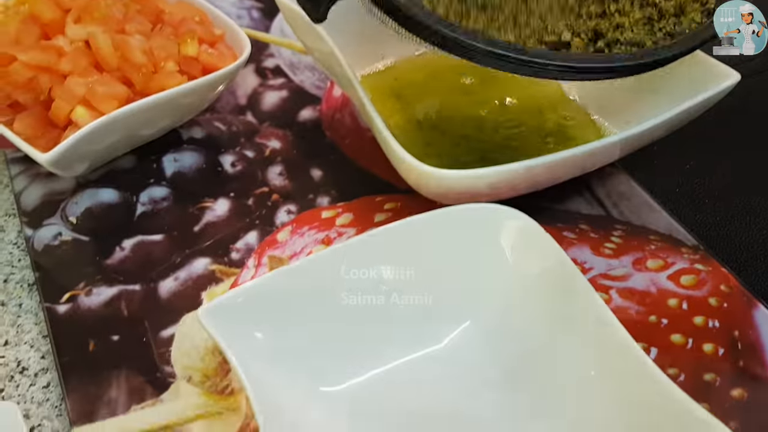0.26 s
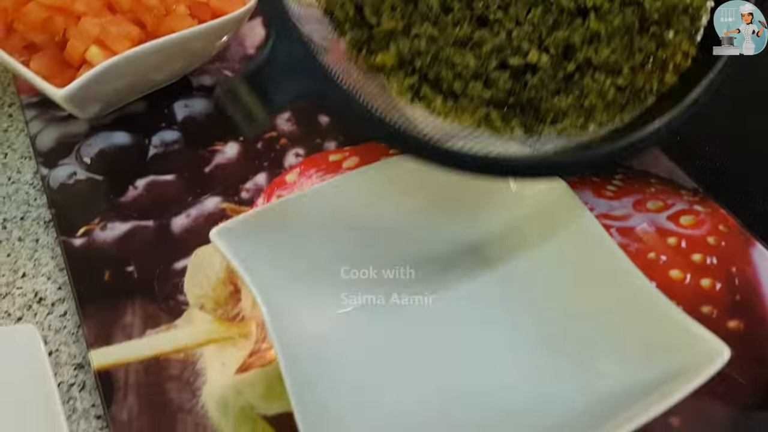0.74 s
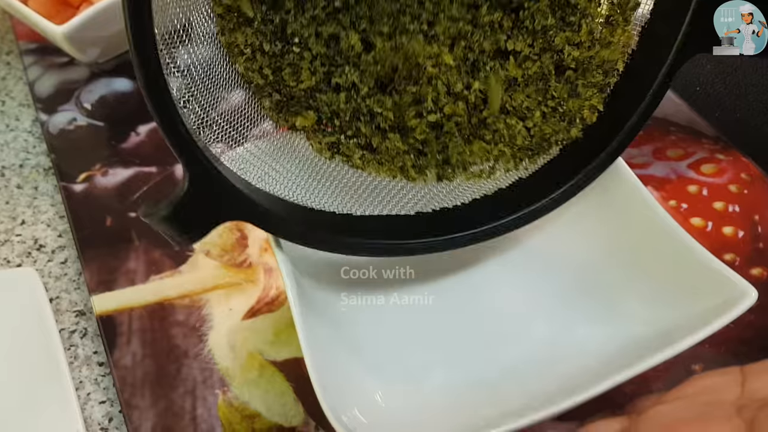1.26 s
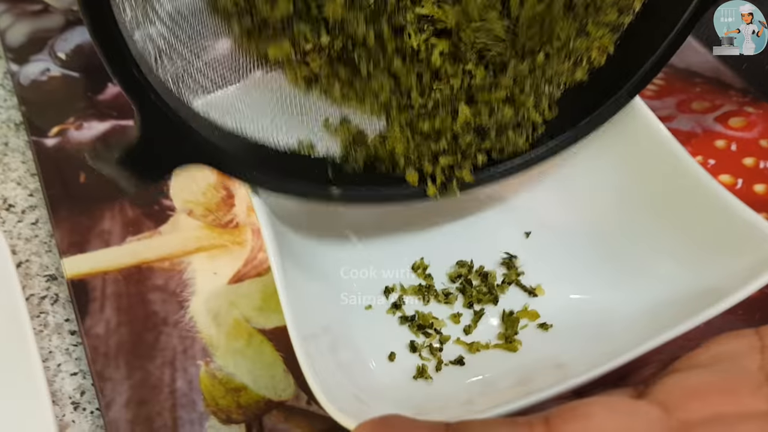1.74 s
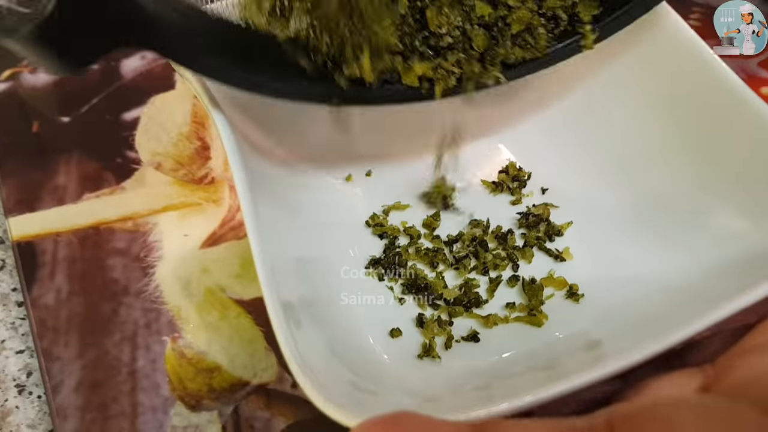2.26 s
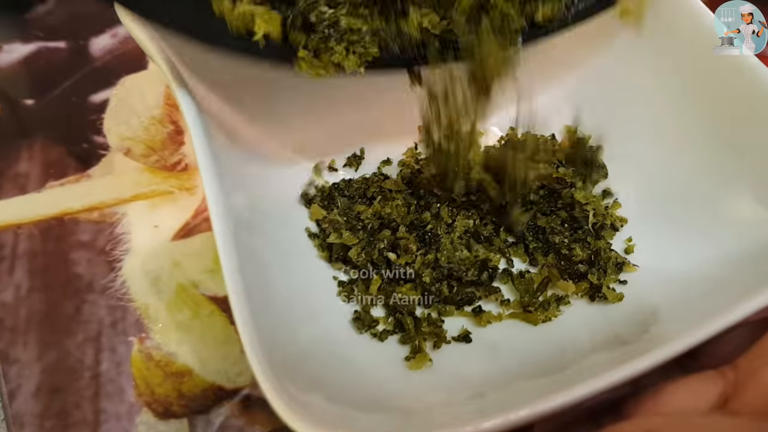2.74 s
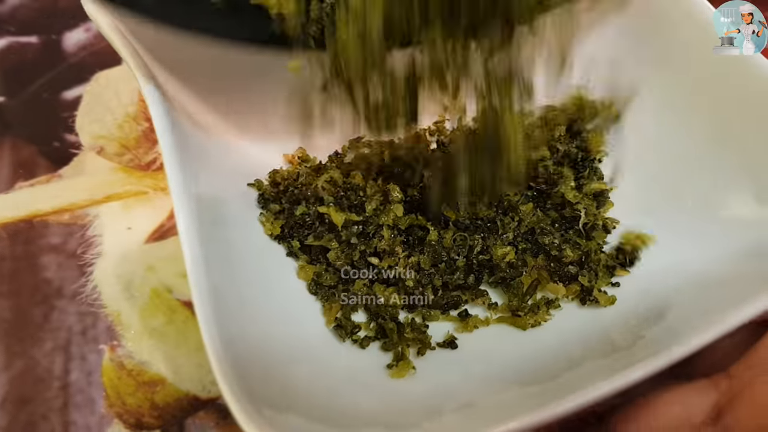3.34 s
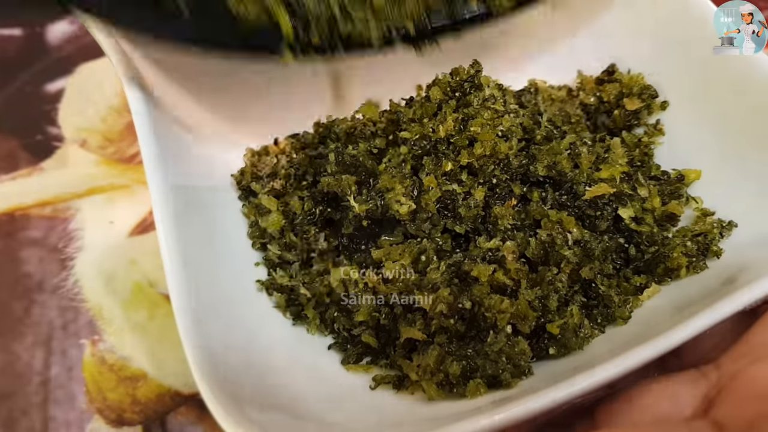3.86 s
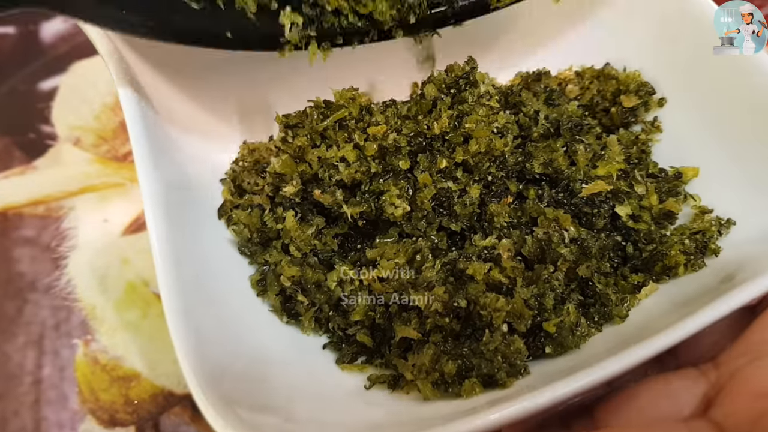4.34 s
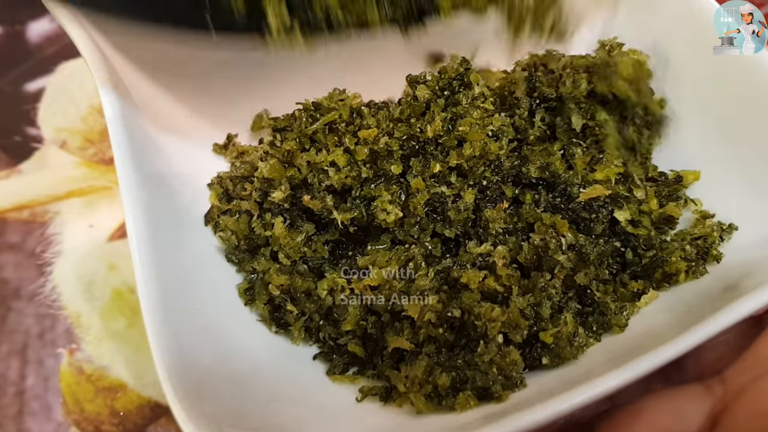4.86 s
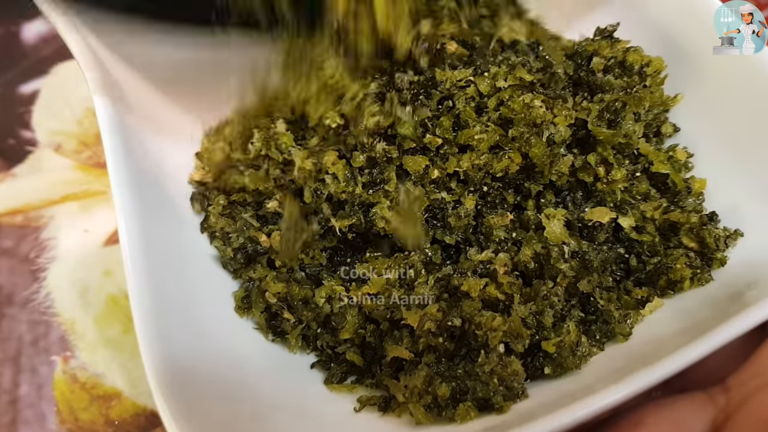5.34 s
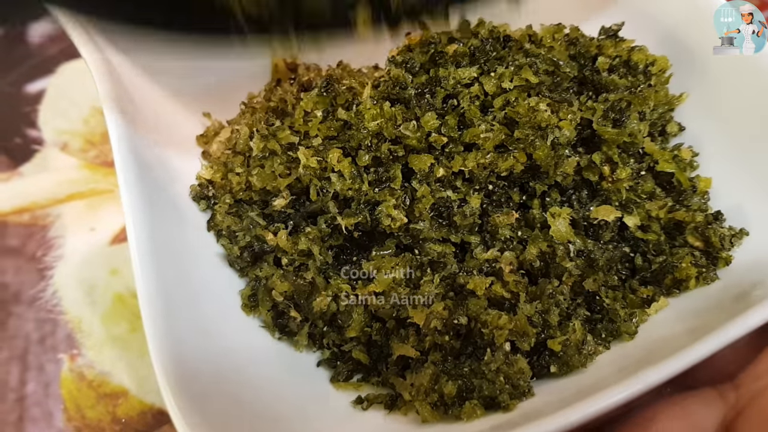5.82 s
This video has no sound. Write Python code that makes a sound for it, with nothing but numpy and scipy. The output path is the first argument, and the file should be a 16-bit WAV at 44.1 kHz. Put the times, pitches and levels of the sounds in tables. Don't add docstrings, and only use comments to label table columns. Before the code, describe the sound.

A strainer's rim clacks sharply against a ceramic dish in two hard doubles, then softer knocks and faint crumb patter follow over a quiet kitchen hum.

```python
import sys
import numpy as np
from scipy import signal
from scipy.fft import rfft, irfft, next_fast_len
from scipy.io import wavfile
from scipy.ndimage import uniform_filter1d, minimum_filter1d, map_coordinates

SR = 44100
rng = np.random.default_rng(int(sys.argv[2]) if len(sys.argv) > 2 else 0)


def file_out(sig):
    cols = np.atleast_2d(sig).T
    lim = np.clip(cols, -1, 1)
    pcm = np.round(lim * 32767).astype(np.int16)
    wavfile.write(sys.argv[1], SR, pcm)


def elevation(decibels):
    levels = np.asarray(decibels, float)
    return 10 ** (levels / 20)


N = 268480


def unit(x):
    return x / np.sqrt(np.mean(x ** 2) + 1e-20)


def along(points, hz):
    f, v = np.transpose(points)
    return np.interp(np.log(hz + 1), np.log(f + 1), v)


def curves(rows):
    s, *cols = np.transpose(rows)
    return [np.interp(np.arange(N) / SR, s, c, left=-150, right=-150) for c in cols]


def wobble(rate):
    knots = rng.standard_normal(int(N * rate / SR) + 4)
    return map_coordinates(knots, [np.arange(N) * rate / SR])


def filtered(x, response):
    m = next_fast_len(len(x) + 8192)
    return irfft(rfft(x, m) * response(np.fft.rfftfreq(m, 1 / SR)), m)[:len(x)]


def coloured(x, points, size=2048):
    cepstrum = irfft(np.log(elevation(along(points, np.fft.rfftfreq(size, 1 / SR)))))
    cepstrum[1:size // 2] *= 2
    cepstrum[size // 2 + 1:] = 0
    return signal.fftconvolve(x, irfft(np.exp(rfft(cepstrum))))[:len(x)]


def body(modes, between_db=-200):
    def response(f):
        total = elevation(between_db)
        for k, (hz, width, db) in enumerate(modes):
            resonance = 1j * f * width / (hz * hz - f * f + 1j * f * width)
            total = total + (-1) ** k * elevation(db) * resonance
        return total
    return response


def after(events, rise_s, t60):
    t = np.arange(N) / SR
    power = np.zeros(N)
    for s, length, db in events:
        release_db = 120 * np.maximum(t - s - length, 0) / t60
        power += elevation(2 * db - release_db) * np.clip((t - s) / rise_s, 0, 1) ** 2
    return np.sqrt(power)


def add(track, s, x):
    part = track[round(s * SR):][:len(x)]
    part += x[:len(part)]


# freq_hz [Hz], t60_s [s]
KITCHEN_DECAY = [(100, 0.84), (400, 0.28), (1000, 0.36), (3000, 0.34), (7000, 0.31), (14000, 0.13)]


def in_room(x, wet_db, near_db=-40):
    hz, t, noise = signal.stft(rng.standard_normal(SR // 2), SR, nperseg=256)
    t60 = np.maximum(along(KITCHEN_DECAY, hz), .05)[:, None]
    fall = elevation(-60 * t / t60) + elevation(near_db - 60 * t / .07)
    tail = signal.istft(noise * fall, SR, nperseg=256)[1]
    tail = np.pad(tail, (130, 0))
    return elevation(wet_db) * signal.fftconvolve(x, tail / np.linalg.norm(tail))[:len(x)]


MAINS_HZ, SHAFT_HZ, FAN_HZ = 50.05, 49.345, 107
OPPOSED_S = .52
FAN_DB = -77
# mains_multiple [x], level_db [dB rms]
MAINS_HUM = [(2, -66), (4, -77)]
# shaft_multiple [x], level_db [dB rms]
ROTOR_ORDERS = [(1, -75), (2, -76), (3, -79), (4, -73), (5, -88), (6, -87)]


def fridge():
    t = np.arange(N) / SR - OPPOSED_S

    def tone(hz, db):
        level = elevation(db + 3 + 1.2 * wobble(4))
        return level * np.sin(2 * np.pi * hz * t + .15 * wobble(3))

    hum = sum(tone(k * MAINS_HZ, db) for k, db in MAINS_HUM)
    rotor = sum(tone(k * SHAFT_HZ, db) for k, db in ROTOR_ORDERS)
    return hum - rotor - tone(FAN_HZ, FAN_DB)


DEEP_DB, HISS_DB = -72.5, -76
SHAKE_DB, SHAKE_PER_DB, SHAKE_RISE_S, SHAKE_T60_S = -42, 0.92, 0.033, 0.92
SIFT_DB, SIFT_PER_DB, SIFT_T60_S, SIFT_FALL_DB = -63.5, 0.06, 0.2, -7.5
# freq_hz [Hz], level_db [dB per Hz]
AIR_COLOUR = [(12, -54), (20, -22), (38, -5), (70, -13.5), (85, -4), (103, -13.5), (126, -22.5), (202, -21),
              (427, -34), (631, -37), (2270, -45.5), (6360, -40.5), (9800, -43), (10400, -46.5),
              (15500, -51.5)]
# time_s [s], level_db [dB]
DISTANT_STIR = [
    (0, -71),
    (1, -69),
    (1.9, -75),
    (2.7, -70.5),
    (4.0, -74),
    (4.8, -75),
    (5.3, -68.5),
    (6.09, -76),
]


def air():
    def blows(top_db, per_db):
        return [(s, 0, top_db + per_db * db) for s, db, *_ in HARD_BLOWS + BOUNCES + SOFT_BLOWS]

    def band(lo, hi):
        noise = rng.standard_normal(N)
        return unit(filtered(noise, lambda f: elevation(along(AIR_COLOUR, f)) * (f >= lo) * (f < hi)))

    shake = after(blows(SHAKE_DB, SHAKE_PER_DB), SHAKE_RISE_S, SHAKE_T60_S)
    falls = [(s, length, db + SIFT_FALL_DB) for s, length, db, _ in CRUMB_FALLS]
    sift = after(blows(SIFT_DB, SIFT_PER_DB) + falls, 0.037, SIFT_T60_S)
    deep, stir = band(0, 94), band(108, 900)
    mid, hiss = band(900, 4700), band(4700, SR)
    table = unit(filtered(rng.standard_normal(N), lambda f: body([(86, 40, 0)])(f) ** 2))
    deep = deep * np.hypot(elevation(DEEP_DB + 1.2 * wobble(2.5)), elevation(-5.5) * shake) + shake * table
    stir = stir * elevation(curves(DISTANT_STIR)[0] + 2.0 * wobble(9))
    mid = mid * elevation(-84.0 + wobble(1.4))
    hiss = hiss * np.hypot(elevation(HISS_DB + .7 * wobble(3)), sift)
    return deep + stir + mid + hiss


DRY_CLICK_DB = -9
# start_s [s], length_s [s], pitch_hz [Hz],
# width_hz [Hz], level_db [dB]
SCUFFS = [(0, .005, 1500, 3000, -66), (.087, .11, 322, 187, -68.5), (.123, .04, 6600, 700, -79),
          (.126, .04, 3980, 500, -75), (.165, .04, 3980, 600, -72), (.36, .022, 2060, 600, -73),
          (.36, .022, 3870, 500, -78), (.38, .04, 2200, 500, -79), (.435, .1, 3930, 390, -76),
          (.492, .04, 2070, 350, -73), (.555, .007, 1000, 2000, -65), (.895, .13, 446, 300, -70.5),
          (1.322, .018, 7000, 4000, -64), (1.8662, .003, 7800, 2200, -47), (2.076, .11, 373, 250, -69),
          (2.27, .05, 6000, 5000, -69), (2.299, .016, 1780, 500, -76), (2.428, .28, 874, 690, -74),
          (2.541, .11, 290, 200, -63.5), (3.047, .023, 2000, 700, -77), (3.265, .015, 1627, 500, -48),
          (3.29, .06, 6000, 4000, -68), (3.395, .06, 6200, 3800, -65), (3.5, .1, 6200, 4000, -64),
          (4.073, .062, 3500, 3500, -70), (4.526, .1, 1160, 450, -78.5), (4.54, .1, 340, 200, -74.5),
          (5.055, .05, 6500, 4000, -72), (5.357, .15, 470, 250, -67), (5.872, .019, 2200, 700, -81)]


def rubs():
    out = np.zeros(N)
    for s, length, hz, width_hz, db in SCUFFS:
        n = int(length * SR)
        grit = np.repeat(elevation(rng.normal(0, 2.8, SR // 200)), 101)[:SR // 2]
        stroke = np.sqrt(np.sin(np.pi * (np.arange(n) / n) ** 0.5))
        scuff = np.zeros(SR // 2)
        scuff[:n] = (rng.standard_normal(SR // 2) * grit)[:n] * stroke
        resonance = body([(hz, width_hz, 0)])
        heard = filtered(scuff, lambda f: resonance(f) ** 2 / (1 + (f / 11500) ** 8))
        wet_db = -7.0 + DRY_CLICK_DB * (length < .006)
        add(out, s, elevation(db) * np.sqrt(SR / width_hz / 2) * (heard + in_room(heard, wet_db)))
    return out


# time_s [s], level_db [dB]
SLIDE_LEVEL = [
    (0.42, -88),
    (0.56, -75),
    (0.852, -68.5),
    (1.11, -76),
]
# freq_hz [Hz], level_db [dB per Hz]
MAT_COLOUR = [(290, -24), (500, -17), (786, -21.5), (1460, -11), (1710, -12.5), (2690, -8.5), (4450, -13),
              (6470, -16.5), (11000, -30.5), (14300, -48.5), (22000, -120)]


def slide():
    grains = rng.standard_normal(N) * elevation(2.4 * wobble(480) + 0.91 * wobble(27))
    hiss = elevation(curves(SLIDE_LEVEL)[0] + 7.5) * unit(coloured(grains, MAT_COLOUR))
    return hiss + in_room(hiss, wet_db=-8.5)


STANDING_RISE_S = 0.035
# pitch_hz [Hz], level_db [dB], t60_s [s]
CUPBOARD_WAVES = [(169, -11, 0.2), (290.7, -15.5, .4), (346, -19, .3), (458.3, -3.5, 0.18),
                  (610, -11.5, 0.29)]


def standing(db, t):
    modes = 0
    for hz, level, t60 in CUPBOARD_WAVES:
        fall = elevation(level + rng.normal(0, 3.4) - 60 * t / t60)
        waver = 1 + .45 * np.cos(2 * np.pi * (rng.uniform(8, 20) * t + rng.random()))
        modes = modes + fall * waver * np.sin(2 * np.pi * hz * t)
    return elevation(db) * modes * (1 - np.exp(-t / STANDING_RISE_S))


ECHO_RISE_S = 0.0073
BLOOM = .6
EDGE_DB, EDGE_PER_DB = -3, 0.29
SLAP_S, SLAP_DB = 0.018, -12.5
# start_s [s], level_db [dB peak], thud_db [dB], brightness_db [dB], chatter_s [s]
HARD_BLOWS = [
    (1.114, -20.5, -17, -20, 0.012),
    (1.123, -16.5, -17.5, -23.5, 0.008),
    (1.359, -26, -15.5, -25.5, 0.02),
    (1.3736, -8.5, -16, -16, 0.008),
    (1.381, -8, -15.5, -15.5, 0.006),
    (1.519, -21.5, -10, -13, 0.0036),
    (1.5411, -5, -14, -12.5, 0.008),
    (1.553, -8, -14, -13.5, 0.008),
]
BOUNCES = [
    (1.656, -21, -14, -18.5, 0.0074),
    (1.679, -30, -11, -21, 0.0086),
]
SOFT_BLOWS = [(2.73, -31.5, -10.5, -23.5, 0.008), (2.734, -31.5, -8, -22.5, 0.0048),
              (2.799, -40, -5, -33.5, 0.0027), (3.2647, -30.5, -9.5, -19, 0.018),
              (3.463, -30.5, -7.5, -19.5, 0.0048), (3.577, -25.5, -10, -21, 0.003),
              (3.581, -29, -12, -21, 0.0067), (3.684, -35, -5, -28, 0.0073),
              (5.18, -32.5, -5.5, -21, 0.0091), (5.495, -33, -3.5, -25.5, 0.011),
              (5.614, -47, -0.5, -28, 0.0068), (5.993, -27.5, -7, -18, 0.015)]
# at_600_hz [dB], at_850_hz [dB], at_1000_1300_hz [dB], at_1400_2200_hz [dB]
HARD_SPOTS = [(-9, -4, 0.4, 2), (-11, -2.1, 2, -1.55), (-0.6, -5, 1.5, 0.35), (-2, -0.9, -0.26, 1.2),
              (-3.5, 1.6, 0.2, 1), (-2.5, -5, 3.4, 2.5), (0, -1.5, 0.3, 0.8), (0.4, -2.3, 1.5, 0)]
BOUNCE_SPOTS = [(-7, 0, .1, 2.5), (2, -0.5, .1, -14)]
SOFT_SPOTS = [(3, -2, 1.1, 2), (0, -2.5, 1.1, -1.2), (1, 1, .1, -3), (-1, 2.5, 2.8, 2), (-3.5, 1.5, .1, -3),
              (6, 0.7, 0.87, 1.5), (-3, 2, .1, -1.5), (2, .1, 0.12, -5), (2, 0.4, .1, -3),
              (0.7, 1, 0.11, -2), (4, 4.5, .1, 1), (0, 4, 2.1, 2)]
# freq_hz [Hz], width_hz [Hz], level_db [dB]
HARD_GAPS = [(704.4, 40, -7.5), (1110, 40, -1.5), (4853, 200, -4)]
SOFT_GAPS = [(964, 48, -3.5), (1290, 68, -1.5), (2160, 54, -8.5)]
# pitch_hz [Hz], width_hz [Hz], level_db [dB]
RIM_ON_DISH = [(465, 25, -14), (590, 42, 4), (861, 44, 4), (1220, 19, -10), (1360, 35, -10),
               (1490, 25, -12), (1710, 39, -8), (2200, 25, -10), (2430, 46, -10), (2640, 43, -13),
               (2890, 41, -12), (3660, 64, -17), (3980, 26, -15), (4600, 68, -23), (4960, 30, -20)]
# pitch_hz [Hz], width_hz [Hz], level_db [dB]
RIM_TWINS = [(532, 36, -4), (781, 30, -5), (819, 30, -3), (915, 36, -4), (1015, 34, -7), (1624, 30, -7),
             (1930, 35, -12)]
# pitch_hz [Hz], width_hz [Hz], level_db [dB]
RIM_IN_AIR = [(291, 18, -14), (452, 27, -9), (556, 30, -9), (592, 34, -5), (710, 30, -9), (781, 22, -8),
              (819, 26, -9), (853, 34, 1), (890, 34, -2), (1220, 26, -10), (1490, 22, -14), (1640, 29, -14),
              (1705, 30, -17), (1940, 45, -19), (2200, 16, -24), (2440, 33, -15), (2630, 39, -19),
              (2890, 34, -17), (3020, 25, -22), (3310, 15, -26), (3690, 32, -22)]


def knocks(blows, spots, gaps, modes, gain_db, ring_db, between_db, wet_db, thump_db, swell, boom_db):
    out, t = np.zeros(N), np.arange(SR // 2) / SR
    hz, width, top_db = np.transpose(modes)
    slope = np.polyfit(np.log(hz), top_db, 1)
    top_db = top_db - np.polyval(slope, np.log(hz))
    f = np.arange(20, 8000, 20.)
    blurred = elevation(2 * top_db - 9) / (1 + ((f[:, None] - hz) / (1.1 * width)) ** 2)
    humps = list(zip(f, 10 * np.log10(elevation(2 * between_db) + np.sum(blurred, 1))))
    dips = list(zip(f, sum(db / (1 + ((f - c) / w) ** 2) for c, w, db in gaps)))
    blow = (t == 0) * 1.
    strongest_db = max(row[1] for row in blows)
    for (s, db, thud_db, bright_db, length), (low_db, main_db, mid_db, spot_db) in zip(blows, spots):
        u = t / max(length, .001)
        contacts = rng.standard_normal(len(t)) * (rng.random(len(t)) < .3)
        contacts[0] = 3.4
        chatter = contacts * (0.31 + u) * np.exp(-u ** 2)
        chatter /= np.linalg.norm(chatter)
        edge_db = EDGE_DB + EDGE_PER_DB * (db - strongest_db)
        tilt = [(40, -43.0), (250, -20.5), (450, thud_db + 7), (590, low_db - 3.5), (700, -2.5),
                (820, main_db - 2.0), (900, main_db - 4.0), (1010, mid_db - 4.0), (1250, mid_db - 5.5),
                (1500, edge_db + spot_db - 1), (2150, edge_db + spot_db - 0.5), (2500, edge_db - 4.0),
                (3300, edge_db - 4.0), (5500, bright_db + 2.5), (9000, bright_db - 16.5),
                (12500, bright_db - 33.0), (14500, bright_db - 47.5), (16000, bright_db - 75)]
        scatter_db = rng.normal(0, 1.7, len(hz))
        level = elevation(top_db + along(tilt, hz) + scatter_db) * width / SR
        phase = rng.random((len(hz), 1))
        swing = np.sin(2 * np.pi * (hz[:, None] * t + phase)) * np.exp(-np.pi * width[:, None] * t)
        build_up = 1 - swell * np.exp(-u / .45 * (hz[:, None] / 1500) ** BLOOM)
        ring = elevation(ring_db) * level @ (swing * build_up) * (1 - np.exp(-t / .0008))
        rattle = coloured(coloured(chatter, tilt), dips)
        direct = ring + elevation(between_db) * rattle
        sideways = coloured(coloured(coloured(blow, tilt), humps), dips)
        echo = in_room(sideways, wet_db, near_db=3.5) * (1 - np.exp(-t / ECHO_RISE_S))
        thump = coloured(blow, [(30, -39.0), (90, -8.0), (200, -16.0), (330, -9.0), (470, -15),
                                (800, -17.0), (2000, -72.5)])
        thump = 0.4 * thump + in_room(thump, wet_db=2.0, near_db=-0.5)
        add(out, s, elevation(db + gain_db) * (direct + echo + elevation(thud_db + thump_db) * thump))
        add(out, s + SLAP_S, elevation(db + gain_db + SLAP_DB) * direct)
        add(out, s, standing(db + thud_db + boom_db, t))
    return out


# start_s [s], pitch_hz [Hz], level_db [dB], t60_s
# [s]
LONE_RINGS = [ (1.121, 788, -47, .62), (1.121, 350, -48, .3), (1.125, 172, -52, .3), (1.543, 345, -27, .2),
              (1.376, 345, -46, .2), (1.545, 41, -48, .6), (1.376, 85, -50, .4), (1.542, 96, -45, .3),
              (1.66, 452, -42, .3), (1.545, 6150, -46, .12), (1.377, 6150, -50, .12),
              (1.125, 1490, -44, .2), (1.125, 2200, -52, .5), (1.125, 1630, -50, .5), (3.585, 452, -44, .3),
              (3.27, 722, -50, .3), (3.268, 1490, -50, .2), (3.585, 783, -46, .25), (6.0, 783, -46, .4),
              (6.0, 452, -40, .3), (3.268, 1750, -50, .12), (5.27, 1630, -70, .2), (3.31, 7860, -62, .15),
              (3.456, 7860, -67, .2), (3.545, 7860, -61, .3), (3.545, 8800, -67, .25),
              (3.682, 7860, -66, .2), (2.388, 8800, -66, .4), (2.265, 11700, -72, .3),
              (2.683, 12400, -66, .12), (2.683, 13000, -69, .2), (2.44, 13000, -72, .4),
              (1.545, 10600, -64, .25), (1.545, 11700, -61, .13), (1.545, 12900, -64, .16),
              (1.38, 13000, -68, .14), (2.852, 7860, -58, .15), (2.683, 7860, -57, .15), (1.6, 82, -47, .6),
              (1.551, 1091, -61, 1.4), (1.543, 6977, -41, .22), (1.518, 6977, -50, .2),
              (1.375, 6977, -47, .2), (3.578, 13600, -65, .1), (3.597, 13600, -66, .08),
              (3.545, 12400, -71, .2), (3.578, 12400, -65, .15), (4.08, 4960, -72, .2),
              (4.204, 5222, -70, .2),
              (1.122, 784, -33, .16), (1.12, 1100, -50, .15), (1.12, 2416, -41, .12),
                  (1.376, 1357, -24, .13), (1.543, 1620, -28, .13), (1.38, 13600, -71.5, .12),
                  (1.38, 11800, -64, .08), (1.546, 9700, -55, .08), (1.36, 6150, -50, .1),
                  (1.36, 5220, -50, .1), (1.517, 6150, -43, .12), (1.517, 5220, -44, .12),
                  (1.517, 4280, -42, .1), (1.38, 2200, -36, .3), (1.55, 2200, -34.5, .3),
                  (1.55, 1220, -36, .25), (2.415, 2800, -66, .4), (5.262, 2885, -69, .2),
                  (5.29, 2770, -68, .15), (1.543, 590, -23, .16), (1.543, 2440, -30, .12),
                  (1.57, 857, -30, .45), (1.376, 590, -28, .14), (1.135, 868, -35, .2),
                  (1.656, 1850, -37, .06), (2.44, 4280, -59, .35), (2.44, 1630, -68, .4),
                  (3.266, 1500, -46, .07), (5.996, 851, -42, .25), (5.996, 891, -46, .2),
                  (1.543, 7030, -44, .15)]


def rings():
    out, t = np.zeros(N), np.arange(SR) / SR
    for s, hz, db, t60 in LONE_RINGS:
        add(out, s, elevation(db - 60 * t / t60) * np.sin(2 * np.pi * hz * t) * (1 - np.exp(-t / 0.0021)))
    return out


TOP_DB, TOP_PER_DB = -3.5, 0.7
# start_s [s], level_db [dB peak], flank_db [dB], hardness_db [dB]
DISH_TICKS = [(1.3608, -31, -8, -20), (1.374, -33, -1, -24), (1.5169, -28.5, -5, -18),
              (1.541, -18, -9.5, -14), (1.9124, -79, 0.5, 18), (2.0014, -56.5, -8.5, -11),
              (2.129, -66, -4.5, -5), (2.2665, -61, -21, 3), (2.3647, -66.5, 3, 0), (2.388, -77, 2, 11.5),
              (2.4247, -63, 1.5, -4), (2.4507, -55.5, 9, 4), (2.462, -56, -4, 5), (2.474, -58, 2, 9),
              (2.534, -70, -13, 11), (2.5569, -61, -11, 1.5), (2.5744, -62, 3, 9), (2.6016, -55, -1, 4),
              (2.63, -68, -10.5, 6), (2.683, -68.5, -16, 20.5), (2.708, -66.5, -8.5, 11),
              (2.852, -69.5, 3, 19), (2.9077, -75.5, -6.5, 13.5), (2.948, -71, -17, 10.5),
              (2.982, -78, -9.5, 18), (3.1567, -75.5, 8, 14), (3.2887, -69.5, -1, 6),
              (3.3013, -72, -8, 12.5), (3.3147, -66.5, -12, 3), (3.4037, -75, -14, 3),
              (3.455, -75, -11.5, 10), (3.5464, -67.5, -19, 7), (3.57, -64, -15, 13),
              (3.5974, -66, -13.5, -10), (3.6814, -73.5, -10, 13.5), (4.0444, -75.5, -8, 16),
              (4.0792, -62.5, -19, -7), (4.1649, -64, -18.5, -3), (4.203, -66.5, -13, 10),
              (4.829, -58, -22, -8), (4.8783, -64.5, -23, -2), (5.2698, -59, -20, -3.5),
              (5.587, -69, -7.5, 6.5)]
# pitch_hz [Hz], width_hz [Hz], level_db [dB]
DISH_MODES = [(1630, 28, -11), (1950, 33, -21), (2200, 27, -18), (2770, 26, -6), (2885, 24, -6),
              (3920, 26, -15), (4280, 28, 0), (5220, 53, -18), (6140, 46, -16), (6860, 46, -7),
              (7030, 33, -8), (7460, 69, -10), (7860, 34, -3), (8800, 32, -9), (9750, 31, -21),
              (10600, 30, -17), (11000, 100, -21), (11700, 36, -21), (12200, 26, -24), (12400, 37, -19),
              (13000, 37, -20), (13600, 46, -28)]


def ticks():
    out = np.zeros(N)
    for s, db, mid_db, high_db in DISH_TICKS:
        spot = [(1700, -12.5), (2800, -1), (3900, mid_db - 10.5), (4300, mid_db + 2.5), (5600, high_db - 0.5),
                (7400, high_db), (11000, TOP_DB + TOP_PER_DB * high_db)]
        modes = [(hz, w, d + along(spot, hz) + rng.normal(0, 2.5)) for hz, w, d in DISH_MODES]
        tap = np.zeros(SR // 4)
        tap[rng.integers(0, 900, 8)] = rng.normal(0, .22, 8)
        tap[0] = .9
        contact = np.convolve(tap, np.hanning(5))[:len(tap)]
        ring = filtered(contact, body(modes))
        add(out, s, elevation(db + 41.5) * (ring + in_room(ring, wet_db=-9.5)))
    return out


FALL_ATTACK_S, FALL_T60_S, TRICKLE_DB = .009, .18, -105
FLANK_DB, BURIED_DB_PER_S = 2, -8
FINEST_DB, FINEST_DB_PER_S = -5, -3
HEAP_DB, HEAP_DB_PER_S = -12, 1.5
# start_s [s], length_s [s], level_db [dB], bare_floor_db [dB]
CRUMB_FALLS = [(1.912, 0.12, -80.5, -5.5), (1.996, 0.054, -78, -2), (2.259, 0.086, -72.5, -11),
               (2.371, 0.059, -71, -1), (2.421, 0.039, -62.5, -4), (2.511, 0.18, -68.5, -2.5),
               (2.847, 0.16, -77, -9), (3.148, .05, -71.5, -17), (3.29, 0.044, -67, 0),
               (3.395, 0.042, -70, -1), (3.495, 0.094, -63, -2.5), (4.037, 0.029, -78.5, -5),
               (4.093, .14, -78.5, -2.5), (4.796, 0.12, -80, -6), (5.051, 0.055, -78, -17),
               (5.237, 0.037, -69, -15), (5.588, 0.027, -79, -19)]


def shower():
    s, lengths, db, bare_db = np.transpose(CRUMB_FALLS)
    since = s - s[0]

    def fall(levels_db):
        return after(list(zip(s, lengths, levels_db)), FALL_ATTACK_S, FALL_T60_S)

    def taps(share):
        sizes = elevation(3.7 * rng.standard_normal(N))
        return rng.standard_normal(N) * sizes * (rng.random(N) < share)

    trickle = elevation(TRICKLE_DB) * (np.arange(N) / SR > s[0])
    floor = fall(db + bare_db)
    flank = fall(db + bare_db + FLANK_DB + BURIED_DB_PER_S * since)
    bright = fall(db) + trickle
    finest = fall(db + FINEST_DB + FINEST_DB_PER_S * since)
    edges_hz = [1000, 3200, 5000, 8300, 14000]
    crumbs = np.zeros(N)
    for lo, hi, level in zip(edges_hz, edges_hz[1:], [floor, flank, bright, finest]):
        family = body([(hz, w, d + 10 * (hz > 9000)) for hz, w, d in DISH_MODES if lo < hz < hi])
        ringing = filtered(taps(0.0071), family) - filtered(taps(0.0039), family)
        crumbs += level * elevation(-4.0) * unit(ringing)
    heap = [(600, -22.0), (1500, -11.0), (4000, -5.0), (7500, -8.5), (11000, -15.0), (15500, -21.0)]
    crumbs += fall(db + HEAP_DB + HEAP_DB_PER_S * since) * unit(coloured(taps(0.065), heap))
    return crumbs + in_room(crumbs, wet_db=-3)


def scene():
    hard = knocks(HARD_BLOWS, HARD_SPOTS, HARD_GAPS, RIM_ON_DISH + RIM_TWINS, gain_db=32.5, ring_db=21.5,
                  between_db=-5.5, wet_db=-0.5, thump_db=-1.5, swell=0.67, boom_db=-6)
    bounce = knocks(BOUNCES, BOUNCE_SPOTS, HARD_GAPS, RIM_IN_AIR, gain_db=30.5, ring_db=20.5,
                    between_db=-6.0, wet_db=-0.5, thump_db=-2, swell=0.39, boom_db=-1.0)
    soft = knocks(SOFT_BLOWS, SOFT_SPOTS, SOFT_GAPS, RIM_IN_AIR, gain_db=31, ring_db=20.5,
                  between_db=-9.5, wet_db=0.1, thump_db=9.0, swell=1.0, boom_db=4)
    strainer = hard + bounce + soft + rings()
    dish = slide() + ticks() + shower()
    return (fridge() + air() + rubs() + dish + strainer)[None]


def roll_off(x):
    return signal.sosfilt(signal.butter(12, 15640, fs=SR, output="sos"), x)


LIMIT, LIMIT_S = .72, .004


def record(dry):
    n = int(LIMIT_S * SR)
    needed = np.minimum(1, LIMIT / (np.abs(dry) + 1e-9))
    duck = uniform_filter1d(minimum_filter1d(needed, 2 * n), n)
    return roll_off(dry * duck)


dry = scene()
out = record(dry)
file_out(out)
```